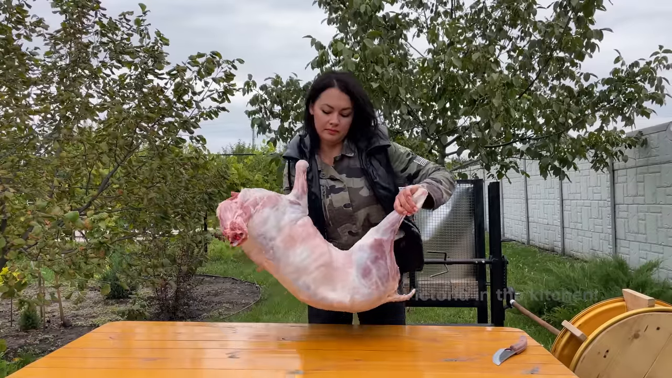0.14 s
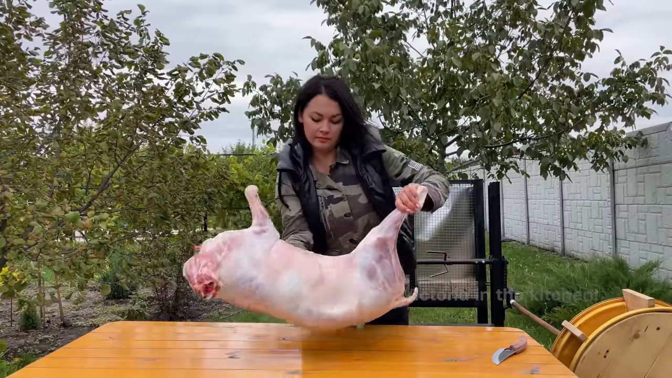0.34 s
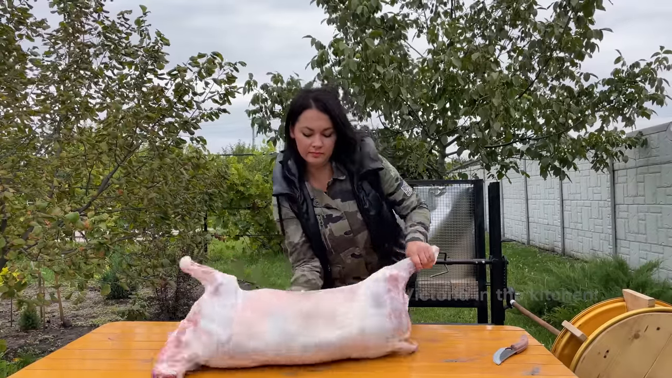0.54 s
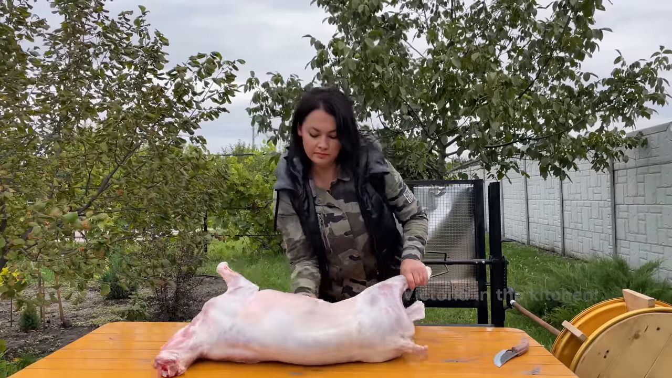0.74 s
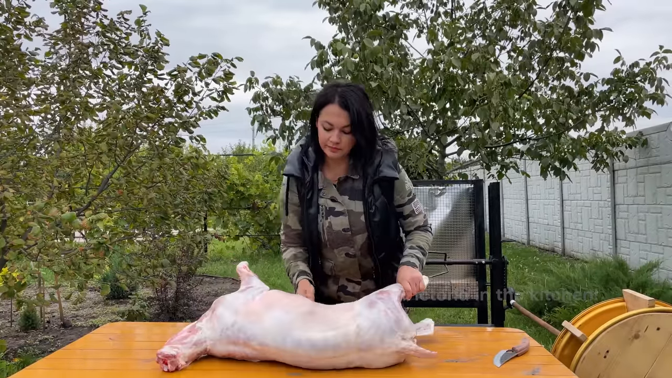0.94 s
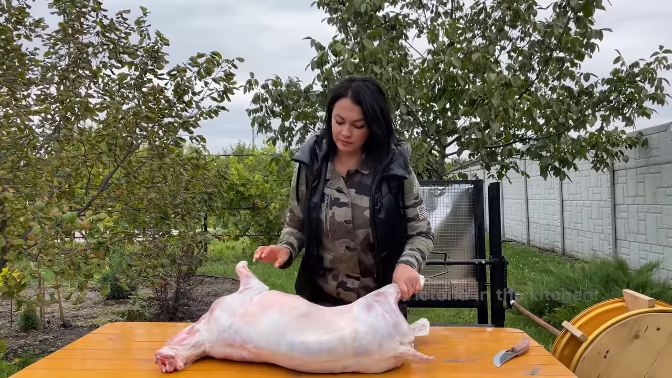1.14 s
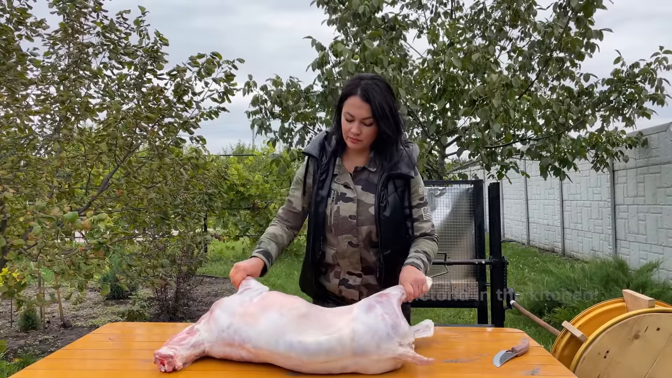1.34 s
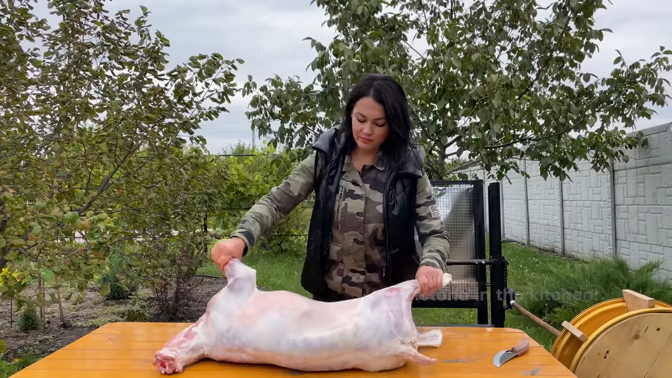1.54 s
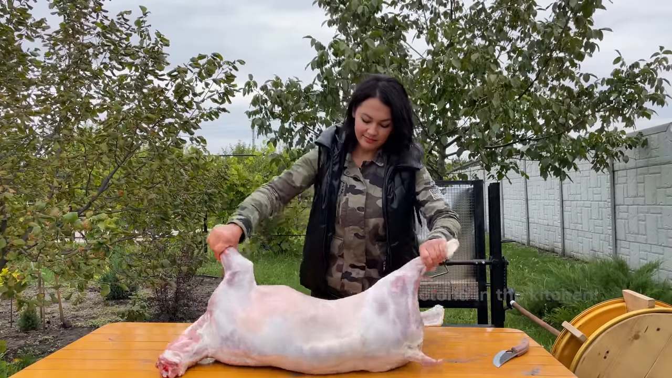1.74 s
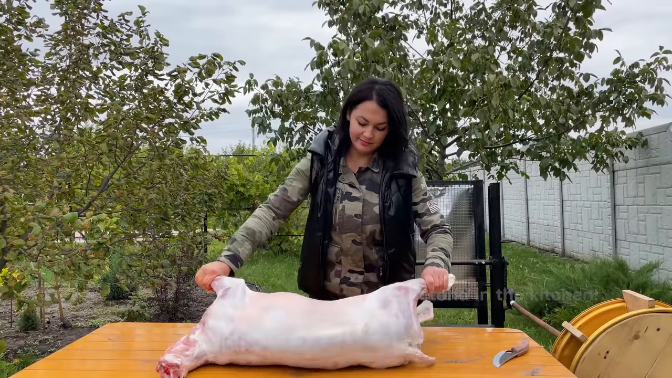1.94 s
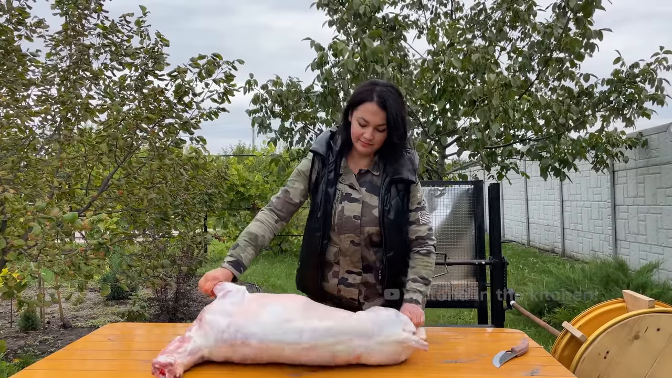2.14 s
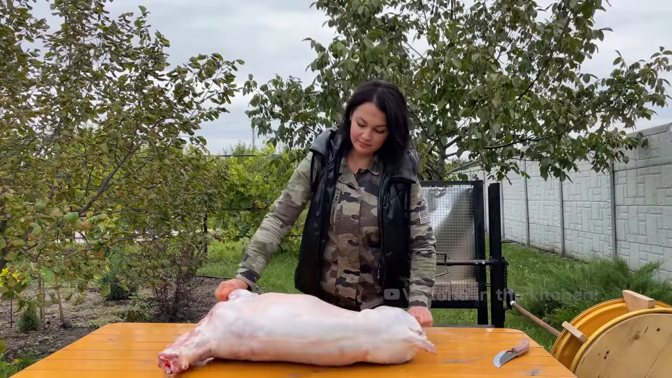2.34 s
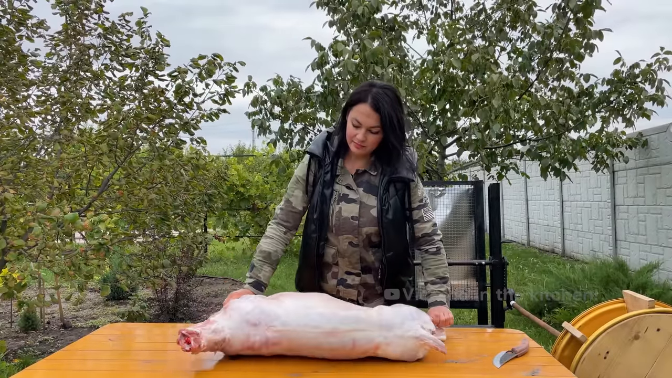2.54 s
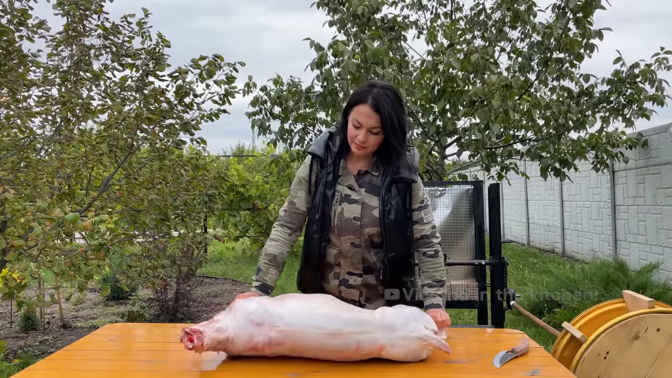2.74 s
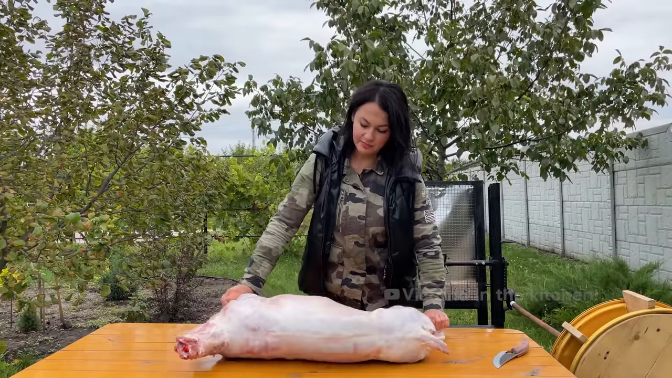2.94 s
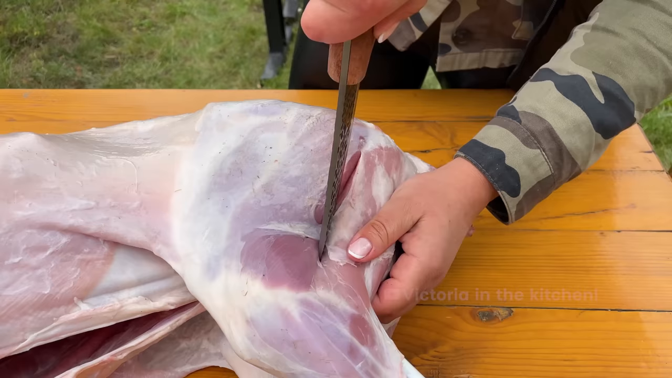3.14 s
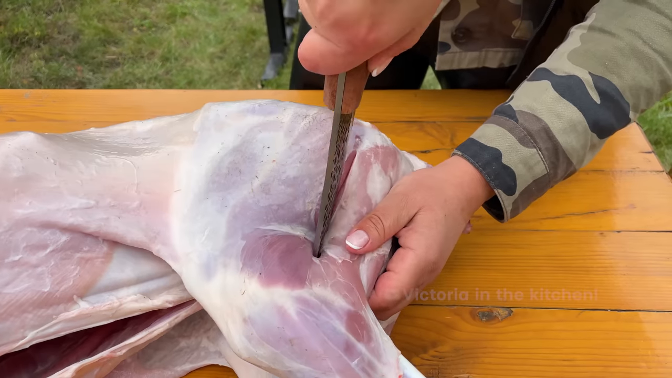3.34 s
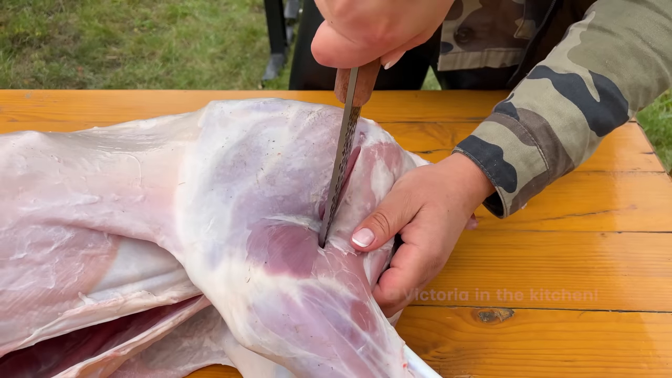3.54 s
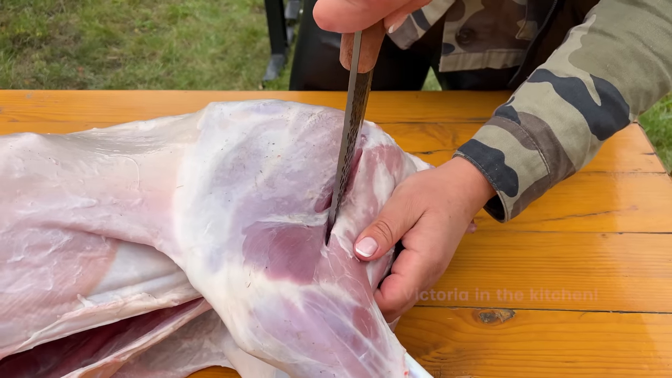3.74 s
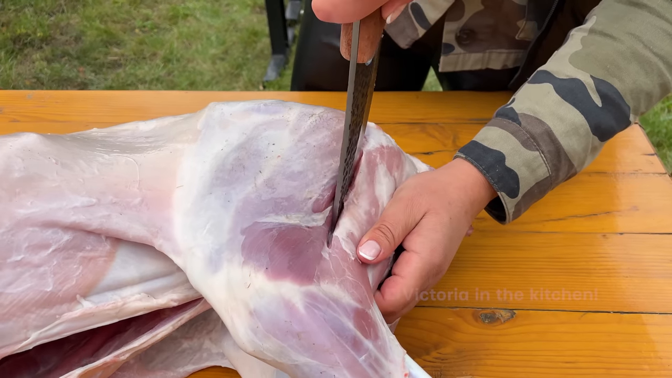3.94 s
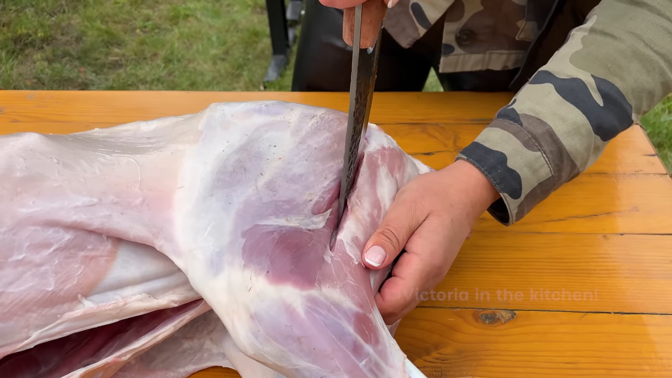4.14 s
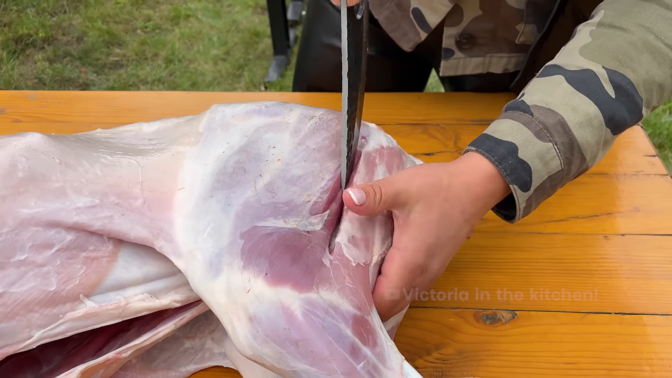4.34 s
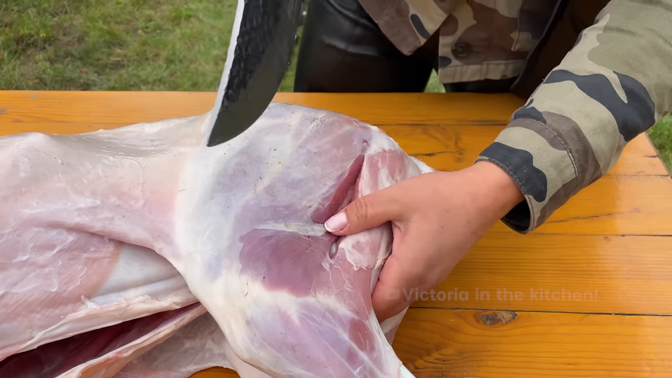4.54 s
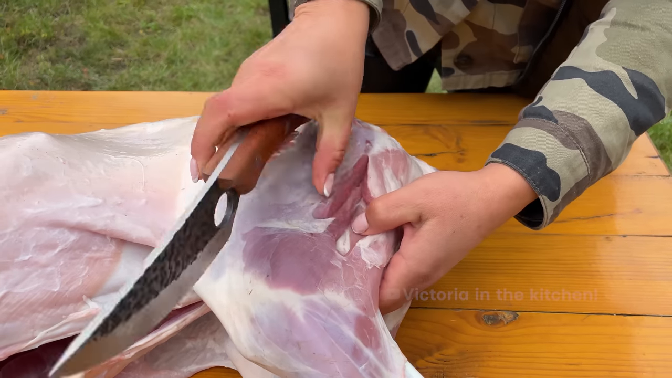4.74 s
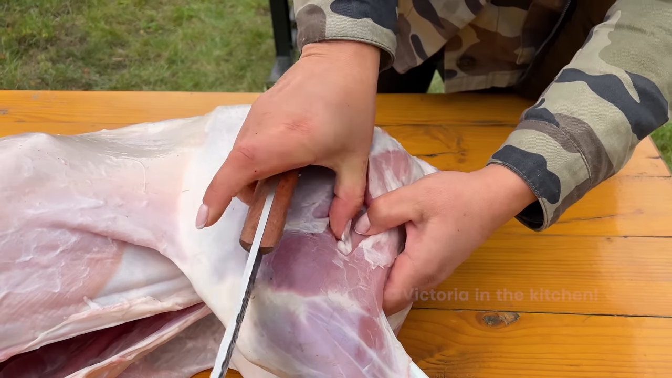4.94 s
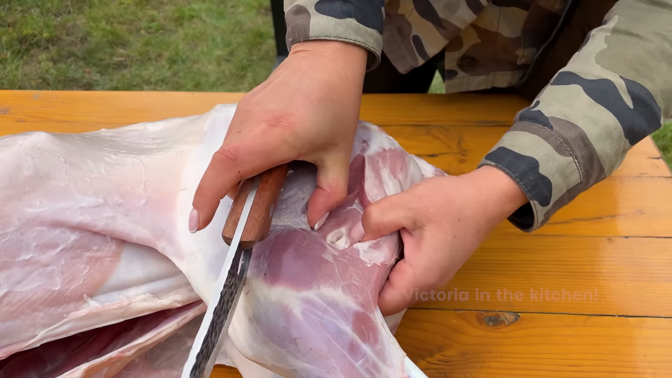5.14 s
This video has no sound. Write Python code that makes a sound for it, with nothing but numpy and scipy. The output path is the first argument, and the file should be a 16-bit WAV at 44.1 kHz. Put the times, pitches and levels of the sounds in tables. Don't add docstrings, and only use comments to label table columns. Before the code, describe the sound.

A heavy wet carcass slaps down on a wooden table outdoors, gets turned with a hard bone knock, then a knife cuts with tiny wet snaps.

```python
import sys
import numpy as np
from scipy import signal
from scipy.io import wavfile
from scipy.ndimage import uniform_filter1d

SR = 44100
rng = np.random.default_rng(int(sys.argv[2]) if len(sys.argv) > 2 else 0)


def file_out(sig):
    cols = np.atleast_2d(sig).T
    lim = np.clip(cols, -1, 1)
    pcm = np.round(lim * 32767).astype(np.int16)
    wavfile.write(sys.argv[1], SR, pcm)


def invert_db(x):
    u = np.asarray(x, float) / 20
    return 10 ** u


N = 233244

# start_s, level_db
GARDEN_LEVEL = [
    (0.0, -67),
    (0.31, -64.5),
    (0.57, -67.5),
    (0.82, -60.5),
    (1.38, -69),
    (2.531, -65.5),
    (3.17, -67.5),
    (3.49, -65),
    (5.29, -66),
]
# freq_hz, density_db_per_hz
GARDEN_SPECTRUM = [(12, -48), (20, -35), (53, 2), (88, -7), (110, -3), (222, -10.5), (255, -5.5),
                   (347, -10.5), (459, -7.5), (607, -9.5), (660, -9.5), (1440, -12.5), (5380, -15.5),
                   (10200, -26.5), (16000, -30.5)]
# freq_hz, level_db, t60_s
KNOCK_MODES = [(140.3, -47.5, 4.7), (263.5, -47, 0.16), (580, -7.5, 0.74), (648, -2, 0.37),
               (680, 5.5, 0.19), (849, -19, 0.23), (876, 0.5, 0.5), (874, -10.5, 0.67), (1200, -9, 0.42),
               (1247, -21.5, 0.72), (1400, -17.5, 0.92), (1680, -20, 0.3), (1157, -1.5, 0.23),
               (1764, -11.5, 0.61), (1780, -15, 0.23), (2057, -18, 0.44), (2143, -21.5, 0.46),
               (1970, -26, 0.57), (2360, -29.5, 0.543)]
# freq_hz, density_db_per_hz
ECHO_SPECTRUM = [(59, -67), (100, -61), (264, -22), (454, -23.5), (618, -4), (755, -19.5), (868, -2),
                 (967, -17), (1820, -18), (4000, -54), (5200, -79.5), (8800, -120)]
# start_s, peak_db, favoured_hz
BLOWS = [(0.06, -49.5, 133), (0.58, -40, 200), (.592, -21.5, 123), (.591, -20, 1500), (.5975, -18, 620),
         (.603, -29, 260), (0.607, -23, 563), (0.611, -22, 250), (.622, -19, 300), (.634, -15, 260),
         (.636, -36, 990), (.652, -26.5, 513), (0.663, -31, 330), (.676, -39, 528), (0.69, -42, 320),
         (.7, -39, 367), (.758, -37, 706), (0.7946, -24, 246), (0.8097, -28, 290), (0.827, -36, 276),
         (.861, -39.5, 285), (.973, -42.5, 686), (0.981, -47.5, 245), (1.656, -52, 333),
         (1.777, -57.5, 253), (2.054, -35, 226), (2.056, -49, 517), (2.072, -48.5, 910), (2.09, -51, 280),
         (2.449, -51.5, 300), (3.398, -53.5, 500), (3.424, -59, 395), (3.691, -61, 260), (3.696, -52, 1000),
         (3.73, -56.5, 596), (4.736, -53.5, 430), (4.772, -65, 388), (4.811, -57, 920)]
# freq_hz, level_db, t60_s
LOADED_BOARD_MODES = [(127.6, -8.5, 0.47), (194, -11.5, 0.059), (219.2, -6, 0.15), (260, 0.5, 0.12),
                      (300, -2, 0.081), (327.1, -5, 0.14), (364, -11, 0.042), (468, -14.5, 0.058),
                      (530, 1.5, 0.17), (612, 5, 0.079), (704, -8.5, 0.17), (802, -8.5, 0.29),
                      (1010, -8, 0.12), (1380, 9.5, 0.05), (1515, 7.5, 0.029)]
# freq_hz, level_db, t60_s
FREE_BOARD_MODES = [(119, -13, 0.32), (260, -5.5, 1.8), (270, -8, 0.91)]
# start_s, peak_db, pocket_hz, treble_db
TURNING_SNAPS = [(0.143, -49, 3170, -38), (0.634, -29, 3530, -20.5), (0.7587, -36, 6650, -29.5),
                 (.7932, -29, 4250, -29), (.7934, -35, 6300, -21), (0.9503, -39.5, 5410, -28),
                 (1.118, -48, 7300, -28), (1.3884, -58, 5520, -19.5), (1.604, -49, 4270, 1),
                 (1.7814, -47, 2980, -34), (1.8667, -47, 4200, -21), (2.0434, -47, 3850, -1),
                 (2.0725, -39, 2800, -26), (2.0828, -36.5, 7450, -20), (2.096, -47, 3730, 3.5),
                 (2.1184, -50, 3530, -12), (2.4274, -53.5, 3660, -10), (2.4602, -43, 6500, -32),
                 (2.4738, -41.5, 2800, -31), (2.4874, -43, 7900, -29), (2.5457, -39.5, 3800, -8.5),
                 (2.5812, -45, 7470, -30), (2.6344, -48, 7500, -34)]
# start_s, peak_db, pocket_hz, treble_db
BLADE_SNAPS = [(3.1374, -55.5, 3980, -23), (3.259, -39, 6400, -44), (3.3028, -44, 6140, -32),
               (3.3973, -49, 6000, 3.5), (3.5473, -59, 3810, -16), (3.585, -50, 4230, -27),
               (3.59, -45, 4230, -30), (3.594, -49, 4200, -36), (3.6364, -47, 4040, -16),
               (3.744, -49, 2560, -1), (3.7938, -48, 7160, 11), (3.808, -36.5, 4000, -11.5),
               (3.8114, -42.5, 2690, -19), (3.8324, -60, 3930, -16), (3.9479, -40.5, 2740, -26.5),
               (3.961, -45.5, 3300, -34), (4.0392, -41, 3700, -21), (4.0609, -43, 7650, -24),
               (4.1307, -45, 3830, -2.5), (4.2365, -46.5, 4300, -17), (4.278, -49, 4110, 1),
               (4.4308, -41, 3500, -27), (4.5156, -62, 4130, -14), (4.75, -43.5, 4100, -11),
               (5.005, -43, 2530, -26), (5.004, -39, 5770, -26), (5.0862, -50, 2800, 0),
               (5.1475, -47.5, 3750, -9)]
# start_s, peak_db, pocket_hz, burst_ms
CRACKS = [(.5697, -39, 4500, 1.5), (.5712, -44, 2000, 2), (.5878, -30, 7000, .5), (.5914, -4, 4100, .25),
          (.5914, -15, 7500, .4), (.5914, -22, 10500, .5), (.5915, -16.5, 1450, 1.0),
          (.5973, -24, 8500, .6), (.5974, -24, 3000, .6), (.5916, -14.5, 3000, .6), (.612, -29, 2600, 2.5),
          (.6002, -23, 6500, .8), (.6083, -14, 4800, .4), (.6084, -21, 8000, .4), (2.1605, -47, 6000, .8),
          (2.1657, -27, 3700, .8), (3.4088, -43, 7500, 1.5), (3.4195, -44, 7500, .7),
          (3.4235, -19.5, 4300, .9), (3.4238, -23, 6100, 1.3), (3.4305, -35, 7200, .8),
          (3.4497, -32, 4800, 1.0), (3.4623, -32, 6600, 1.8), (3.6698, -37, 5000, .8),
          (3.6734, -30, 5000, 1.2), (3.6795, -40, 4500, 1.0), (3.6895, -28, 2900, 1.6),
          (3.6905, -29, 5200, 1.2), (3.697, -32, 6000, .8), (3.6963, -33, 2900, 1.0),
          (3.6966, -45, 1500, 1.5), (3.4885, -41, 4500, 1.0), (3.475, -40, 4200, 1.5),
          (3.7075, -32, 5600, 1.2), (3.7115, -30, 5600, 1.2), (3.7095, -37, 2900, 2.5),
          (3.7125, -36, 2700, 2), (3.7163, -35, 6500, .8), (3.7301, -34, 2450, 1.6),
          (3.7305, -38, 5700, 1.2), (3.7303, -48, 1400, 1.5)]
# time_s, pitch_hz, level_db
CROWS = [
    [(0.26, 1390, -70), (0.364, 1508, -69), (0.544, 1500, -72), (0.575, 1600, -57)],
    [(0.79, 1540, -47), (0.794, 1502, -68), (1.058, 1447, -66), (1.138, 1407, -71), (1.27, 1466, -84)],
]
# time_s, pitch_hz, level_db
FAR_CALLS = [
    [(.38, 1266, -88), (.45, 1270, -78), (.57, 1260, -77)],
    [(2.47, 864, -92), (2.5, 867, -66), (2.55, 850, -80)],
    [(2.58, 493.4, -79.5), (2.7, 490, -75.5), (2.9, 465.4, -82), (3.12, 459.5, -78), (3.18, 463, -97)],
]
# start_s, length_s, level_db, centre_hz
TEARS = [(0.573, 0.053, -46.5, 3720), (1.767, 0.038, -65, 3580), (2.057, 0.053, -60, 3500),
         (2.086, 0.059, -62.5, 6800), (2.162, 0.04, -58.5, 3580), (2.442, 0.12, -68.5, 5900),
         (3.258, 0.077, -66, 5970), (3.395, 0.034, -59, 6040), (3.425, 0.012, -50, 5000),
         (3.44, 0.013, -45.5, 4350), (3.455, 0.0048, -50, 3440), (3.459, 0.023, -50.5, 4350),
         (3.483, 0.0056, -54, 4800), (3.579, 0.029, -59.5, 4100), (3.67, 0.053, -52.5, 4440),
         (3.683, 0.035, -57, 2830), (3.703, 0.012, -54.5, 2700), (3.802, 0.041, -61, 3700),
         (3.931, 0.044, -57, 2800), (3.934, 0.028, -59.5, 1420), (4.123, 0.044, -64, 4340),
         (4.398, 0.095, -66, 3700), (4.498, 0.091, -69.5, 4400), (5.097, 0.12, -72.5, 4100)]
# start_s, length_s, level_db, centre_hz
SPLAT = (.593, .17, -53, 3900)
# start_s, level_db
JOLTS = [
    (0.598, -44.5),
    (.636, -37),
    (.796, -43),
    (.862, -57.5),
    (.98, -60.5),
    (1.101, -73),
    (1.673, -65),
    (2.053, -53),
]
# freq_hz, level_db, t60_s
FRAME_MODES = [(121.7, -9.5, 0.36), (152.7, -0.5, 0.22), (203, 0.5, 0.215), (255, -19.5, 2),
               (320.6, 1, 0.35), (337, -26, .7), (464.6, -33.5, 3.3), (663, -27, 1.1)]
# start_s, level_db, buzz_t60_s, scrape_share, favoured_hz
KNIFE_HOPS = [(0.637, -50, 0.18, 0.98, 4270), (0.679, -55, 0.16, 0.42, 6990),
              (0.705, -57, 0.12, 0.55, 5520), (0.811, -61.5, 0.061, 0.86, 5150),
              (0.904, -58.5, 0.18, 0.23, 2840), (0.925, -66, 0.1, 0.36, 6100), (0.958, -65, 0.25, 1, 8500),
              (0.997, -62.5, 0.29, 0.49, 6300), (1.022, -64, 0.25, 0.41, 5500), (1.119, -70, .1, .1, 5150),
              (1.129, -55.5, 0.14, 0.17, 6990), (1.15, -62, 0.065, .1, 4270),
              (1.172, -62, 0.18, 0.32, 5520), (1.197, -81, 0.11, 0.24, 4960),
              (1.36, -72.5, 0.5, 0.52, 5450), (2.197, -51.5, 0.14, 0.11, 5150),
              (2.212, -61, 0.22, 0.59, 8500), (2.222, -57, 0.14, 0.8, 6100),
              (2.234, -53.5, 0.14, 0.27, 5150), (2.249, -57.5, 0.13, 0.54, 5560),
              (2.272, -63.5, 0.1, 0.83, 6100)]
# freq_hz, width_hz, level_db
BLADE_MODES = [(2840, 24, -8.5), (3270, 28.5, -21), (4270, 27, -8.5), (4960, 46, -9.5), (5150, 29, -5.5),
               (5520, 64, -4.5), (6000, 94, -8.5), (6300, 17, -13), (6990, 37, -8), (8500, 50, -9),
               (9910, 98, -6), (11460, 90, -15)]
# freq_hz, level_db, t60_s
BARE_BOARD_MODES = [(326, -6, 0.41), (500, -3.5, .13), (221, -17.5, 0.28), (260, -21, .08),
                    (370, -8, 0.085), (618, -10, 0.1), (775, -12, .11), (943, -11, 0.18), (1274, -14, 0.15),
                    (1454, 0, 0.041), (1933, -26.5, 0.36), (2226, 0, .05), (2800, -17, 0.069),
                    (3240, -28, 0.46), (1025, -14, 0.17)]
# start_s, level_db
SLEEVE_LEVEL = [
    (4.7, -71),
    (4.772, -58),
    (4.996, -72.5),
    (5.002, -77),
    (5.05, -75),
]
# freq_hz, density_db_per_hz
CLOTH_SPECTRUM = [(88, -36), (150, -26), (418, -6), (545, -33), (588, -23), (893, -7), (1360, -13),
                  (4930, -12), (14000, -33)]


def read(points, hz):
    f, value = np.transpose(points)
    return np.interp(np.log(hz + 1), np.log(f + 1), value)


def evened(x):
    return x / np.sqrt(np.mean(x ** 2) + 1e-20)


def add(mix, start_s, sound):
    part = mix[max(round(start_s * SR), 0):][:len(sound)]
    part += sound[:len(part)]


def spread(rows):
    s, *columns = np.transpose(rows)
    t = np.arange(s[0], s[-1], 1 / SR)
    return s[0], [np.interp(t, s, c) for c in columns]


def band(x, lo_hz, hi_hz):
    edges_hz = np.clip([lo_hz, hi_hz], 20, 20000)
    return signal.sosfilt(signal.butter(2, edges_hz, "band", fs=SR, output="sos"), x)


def resonate(x, hz, width_hz):
    turn = np.exp(2j * np.pi * np.cumsum(hz * np.ones(len(x))) / SR)
    r = np.exp(-np.pi * width_hz / SR)
    return 2 * (turn * signal.lfilter([1 - r], [1, -r], x / turn)).real


def ring(modes, t, phases):
    return sum(invert_db(db - 60 * t / t60) * np.sin(2 * np.pi * (hz * t + p))
               for (hz, db, t60), p in zip(modes, phases))


def clicks(size, per_s, spread_db):
    chance, sign, size_draw = rng.random((size, 3)).T
    height = invert_db(spread_db * np.minimum(-np.log(size_draw + 1e-9), 4))
    return (chance < per_s / SR) * np.sign(sign - .5) * height


def hiss(spectrum, patchy_db):
    hz = np.fft.rfftfreq(1024, 1 / SR)
    a, b, patches = rng.standard_normal((N // 256 + 5, 513, 3)).T
    patches = uniform_filter1d(patches, size=14, axis=0)
    patches = evened(uniform_filter1d(patches, size=10, axis=1))
    z = (a + 1j * b) * invert_db(read(spectrum, hz)[:, None] + patchy_db * patches)
    return evened(signal.istft(z, nperseg=1024, noverlap=768)[1][:N])


def played(x, rows):
    s, db = np.transpose(rows)
    return x * invert_db(np.interp(np.arange(N) / SR, s, db, -200, -200))


def garden():
    return played(hiss(GARDEN_SPECTRUM, patchy_db=1.5), GARDEN_LEVEL)


def knock():
    modes_db, echo_db, echo_t60_s = -44.5, -46, 0.67
    t = np.arange(N) / SR
    modes = ring(KNOCK_MODES, t, rng.random(len(KNOCK_MODES)))
    echo = hiss(ECHO_SPECTRUM, patchy_db=2.0)
    return invert_db(modes_db) * modes + invert_db(echo_db - 60 * t / echo_t60_s) * echo


def blow(boards, contact_ms, settle_t60_s, settle_db):
    t = np.arange(4096) / SR
    force = rng.standard_normal(4096) * invert_db(settle_db - 60 * t / max(settle_t60_s, .002))
    force[0] = 1
    push = np.hanning(int(np.clip(contact_ms, .02, 8) * SR / 1000) + 3)
    sound = signal.fftconvolve(boards, np.convolve(force, push))
    return sound / abs(sound).max()


def table():
    contact_cycles, settle_t60_s, settle_db = 0.23, 0.058, -29
    damp_db_per_db, light_db = -.3, -40
    free_db, free_per_db = -45, 0.5
    thud_db, thud_t60_s, thud_ratio = -13.5, 0.097, 1.97
    out, t = np.zeros(N), np.arange(SR // 4) / SR
    free = ring(FREE_BOARD_MODES, np.arange(SR) / SR, np.zeros(len(FREE_BOARD_MODES)))
    for s, db, place_hz in BLOWS:
        luck = rng.standard_normal((len(LOADED_BOARD_MODES), 2)) * [.008, 1.5]
        choke = invert_db(damp_db_per_db * max(db - light_db, 0))
        modes = []
        for (hz, d, t60), (detune, level) in zip(LOADED_BOARD_MODES, luck):
            off_place_db = 10.0 * np.log2(hz / place_hz) ** 2
            modes.append((hz * (1 + detune), d + level - off_place_db, t60 * choke))
        boards = invert_db(free_db + free_per_db * db) * free
        add(boards, 0, ring(modes, t, np.zeros(len(modes))))
        thud = evened(band(rng.standard_normal(len(t)), place_hz / thud_ratio, place_hz * thud_ratio))
        onset = np.minimum(t / 0.0047, 1)
        add(out, s, invert_db(db + thud_db - 60 * t / thud_t60_s) * onset * thud)
        add(out, s, invert_db(db) * blow(boards, 1000 * contact_cycles / place_hz, settle_t60_s, settle_db))
    return out


def snap(hz, treble_db, burst_ms, pocket_db):
    spike, skirt_db = 5.0, -13
    t = np.arange(2048) / SR
    u = t / (max(burst_ms, .1) / 1000)
    envelope = np.minimum(4 * u, 1) * np.exp(-u ** 2) + 0.09 * invert_db(-60 * t / 0.027)
    burst = rng.standard_normal(len(t)) * envelope
    burst[round(burst_ms * SR / 4000)] += spike
    wide = band(band(burst, .68 * hz, 1.5 * hz), .5 * hz, 1.9 * hz)
    treble = evened(band(burst, 8000, 14500))
    pocket = evened(resonate(wide, hz, 410))
    skirt = evened(band(burst, .25 * hz, 2.4 * hz))
    sound = evened(wide) + invert_db(treble_db + 8) * treble + invert_db(pocket_db) * pocket
    sound = sound + invert_db(skirt_db) * skirt
    return sound / abs(sound).max()


def snaps():
    out = np.zeros(N)
    for s, db, hz, burst_ms in CRACKS:
        add(out, s, invert_db(db) * snap(hz, -25, burst_ms, -4))
    for s, db, hz, treble_db in TURNING_SNAPS + BLADE_SNAPS:
        pocket_db = 3 * np.log2(hz / 4000)
        add(out, s, invert_db(db) * snap(hz, treble_db, .8, pocket_db))
    return out


def birds():
    out = np.zeros(N)
    calls = [(CROWS[0], -5), (CROWS[1], -20)] + [(rows, -60) for rows in FAR_CALLS]
    for rows, half_db in calls:
        s, (hz, db) = spread(rows)
        waver = evened(uniform_filter1d(rng.standard_normal(len(hz)), size=700))
        phase = 2 * np.pi * np.cumsum(hz * (1 + 0.0033 * waver)) / SR
        tone = np.sin(phase) + invert_db(half_db) * np.sin(phase / 2)
        level = np.sqrt(2) * invert_db(db + 0.95 * waver[::-1])
        add(out, s, level * tone * signal.windows.tukey(len(hz), .1))
    return out


def squelch():
    flesh_width_hz, tears_per_s = 18000, 1700
    gap_db, gap_width_hz = -3, 600
    out = np.zeros(N)
    for (s, length_s, db, hz), fade_db in [(SPLAT, -26)] + [(row, 0) for row in TEARS]:
        size = round(length_s * SR)
        clumps = invert_db(2.5 * evened(uniform_filter1d(rng.standard_normal(9000), size=100)))
        tears = evened(clicks(9000, tears_per_s, 2.2)) + .7 * rng.standard_normal(9000)
        tears = clumps * tears
        wet = evened(resonate(resonate(tears, hz, flesh_width_hz), hz, 7900))
        wet = wet + 0.037 * evened(band(tears, 6490, 22000))
        wet = wet + invert_db(gap_db) * evened(resonate(tears, hz, gap_width_hz))
        wet = evened(band(wet, .35 * hz, 11000)[:size])
        wet = wet * signal.windows.tukey(size, min(.25, .01 / length_s))
        add(out, s, invert_db(db + fade_db * np.linspace(-.5, .5, size)) * wet)
    return out


def frame():
    out, t = np.zeros(N), np.arange(SR + SR // 2) / SR
    for s, db in JOLTS:
        hum = ring(FRAME_MODES, t, rng.random(len(FRAME_MODES)))
        add(out, s, invert_db(db) * np.minimum(t / 0.003, 1) * hum)
    return out * invert_db(1.7 * evened(uniform_filter1d(rng.standard_normal(N), size=1500)))


def rattle():
    touches_per_s, favour_db, favour_octaves = 780, 6.5, 0.096
    out, t = np.zeros(N), np.arange(9000) / SR
    for s, db, t60, scrape, favoured_hz in KNIFE_HOPS:
        touches = clicks(len(t), touches_per_s, 1.2) + 0.14 * rng.standard_normal(len(t))
        touches = touches * invert_db(-60 * t / t60)
        touches[0] = 0.74
        away = np.log2(np.transpose(BLADE_MODES)[0] / favoured_hz) / favour_octaves
        share_db = 1.5 * rng.standard_normal(len(BLADE_MODES)) + favour_db * np.exp(-away ** 2)
        steel = np.zeros(len(t))
        for (hz, width_hz, mode_db), p in zip(BLADE_MODES, share_db):
            mode = resonate(resonate(touches, hz, 1.6 * width_hz), hz, 9 * width_hz)
            steel += invert_db(mode_db + p) * evened(mode)
        buzz = evened(steel) + 1.8 * scrape * evened(band(touches, 3640, 7640))
        add(out, s, invert_db(db) * buzz / np.std(buzz[:1300]))
    return out


def bone():
    crowd_db, tilt_db_per_octave, crowd_cycles = -9.5, 0.5, 66
    t = np.arange(SR // 2) / SR
    luck = rng.standard_normal((70, 2))
    hz = np.geomspace(620, 4700, len(luck)) * (1 + .008 * luck[:, 0])
    db = crowd_db + tilt_db_per_octave * np.log2(hz / 1000) + 2 * luck[:, 1]
    crowd = list(zip(hz, db, crowd_cycles / hz))
    board = ring(BARE_BOARD_MODES, t, np.zeros(len(BARE_BOARD_MODES)))
    board = board + ring(crowd, t, rng.random(len(crowd)))
    out = np.zeros(N)
    add(out, 2.1653, invert_db(-18.5) * blow(board, .1, .008, -22))
    return out


def sleeve():
    return played(hiss(CLOTH_SPECTRUM, patchy_db=-0.5), SLEEVE_LEVEL)


def throw_back(near):
    t = np.arange(SR // 4) / SR
    yard = clicks(len(t), 2300, 1.4) * invert_db(-60 * t / 0.44) * (t > .003)
    return invert_db(-22.0) * signal.fftconvolve(near, yard / np.linalg.norm(yard))[:N]


def scene():
    near = table() + frame() + bone() + snaps() + squelch() + rattle()
    near = band(band(near, 115, 14000), 90, 17000)
    near = near + throw_back(near)
    far = garden() + knock() + birds()
    return (near + far + sleeve())[None]


def roll_off(x):
    return signal.sosfilt(signal.butter(12, 16250, fs=SR, output="sos"), x)


def record(dry):
    return roll_off(dry)


dry = scene()
out = record(dry)
file_out(out)
```